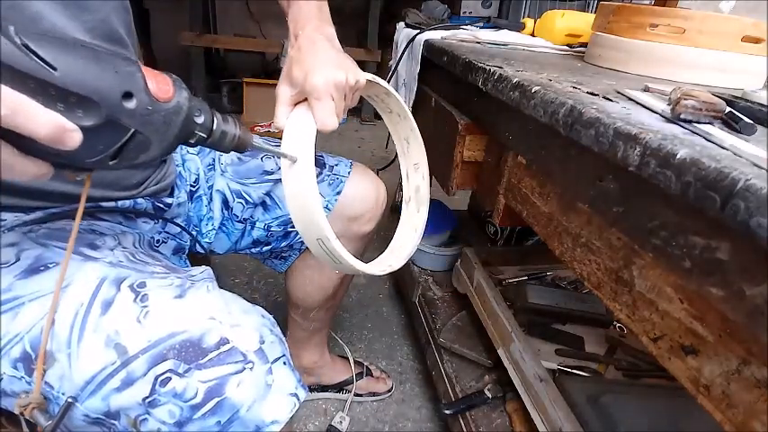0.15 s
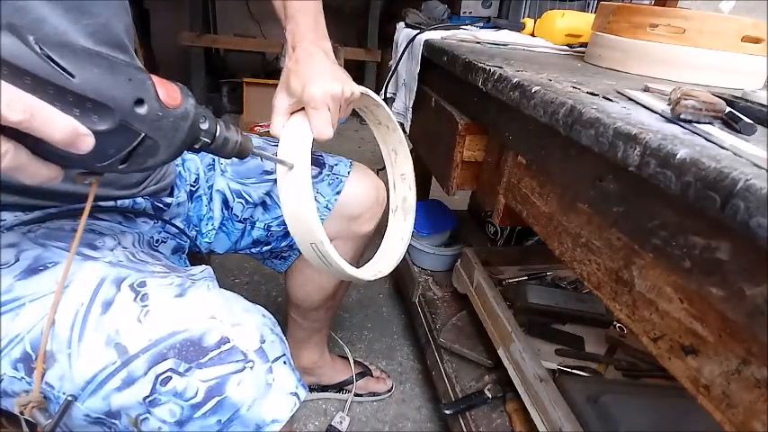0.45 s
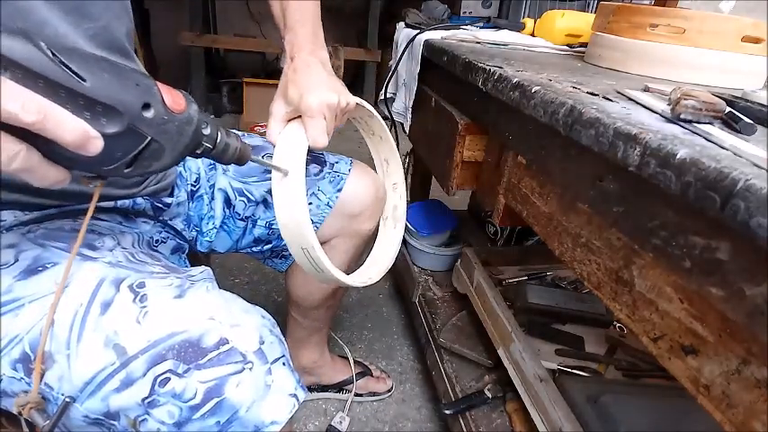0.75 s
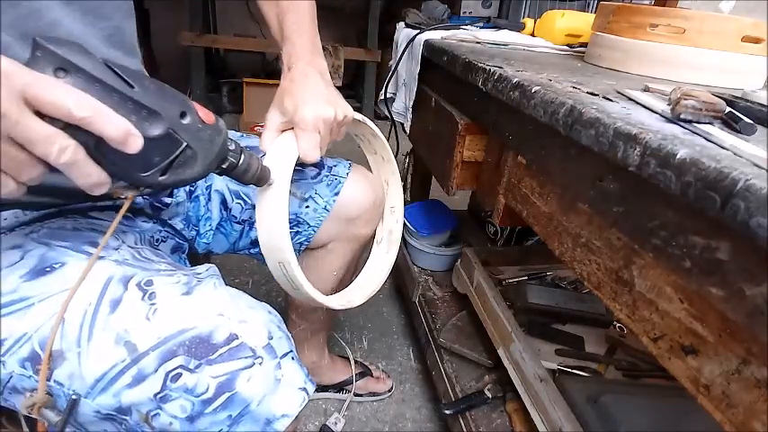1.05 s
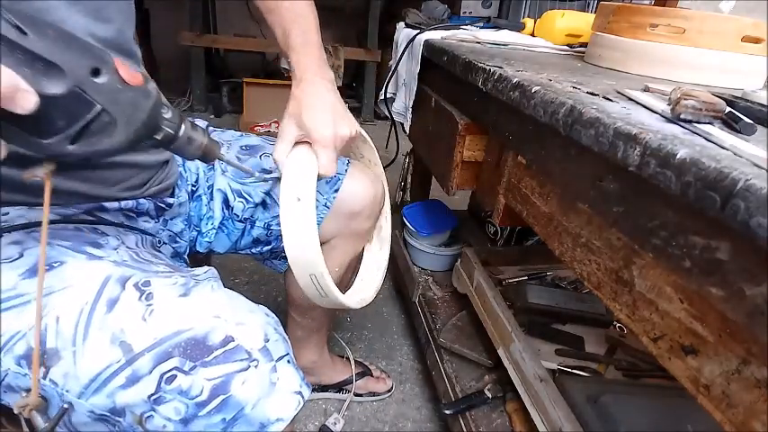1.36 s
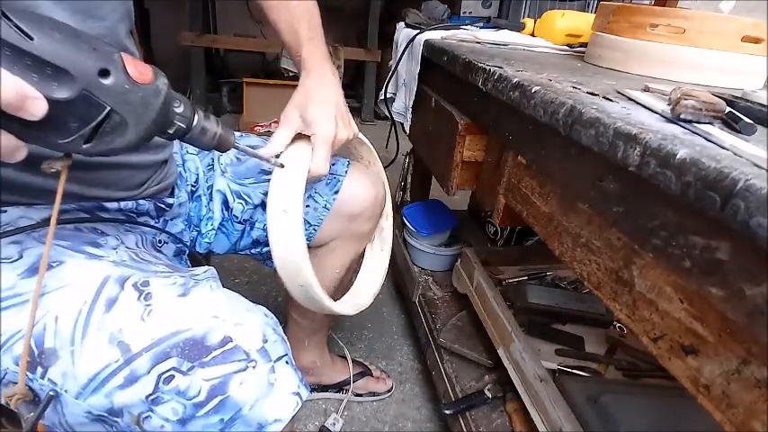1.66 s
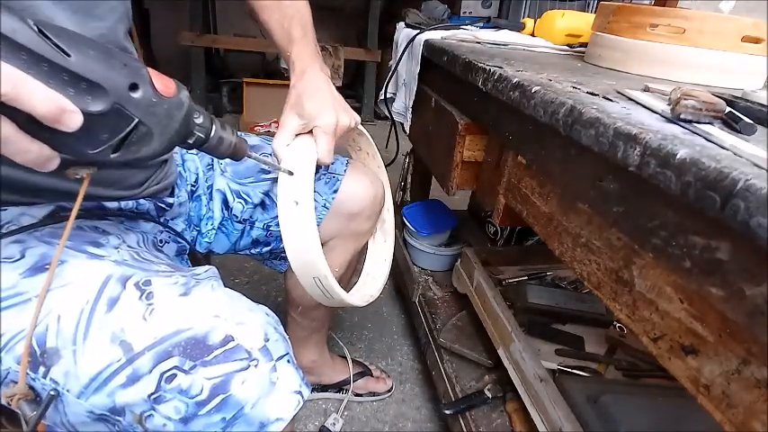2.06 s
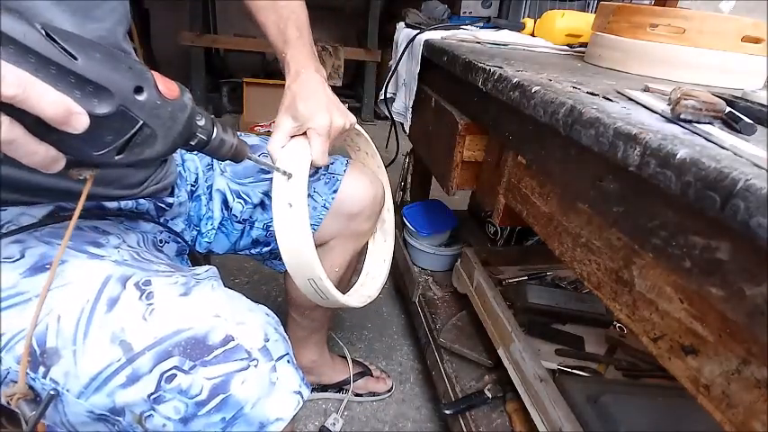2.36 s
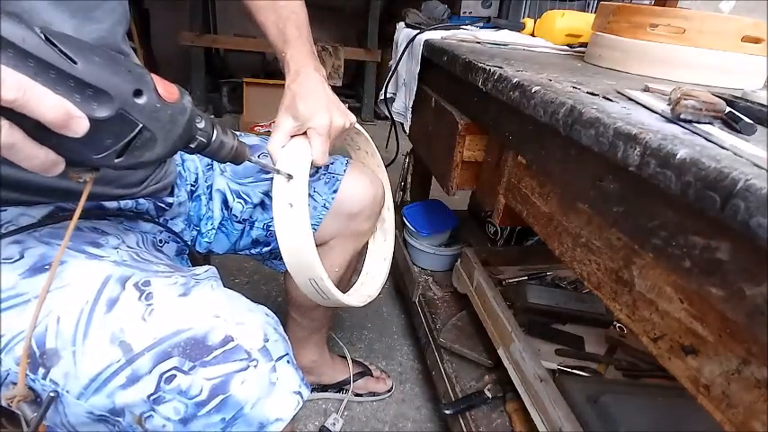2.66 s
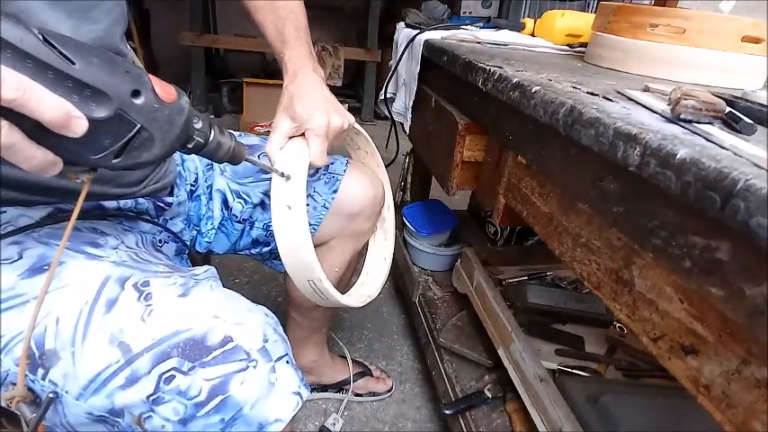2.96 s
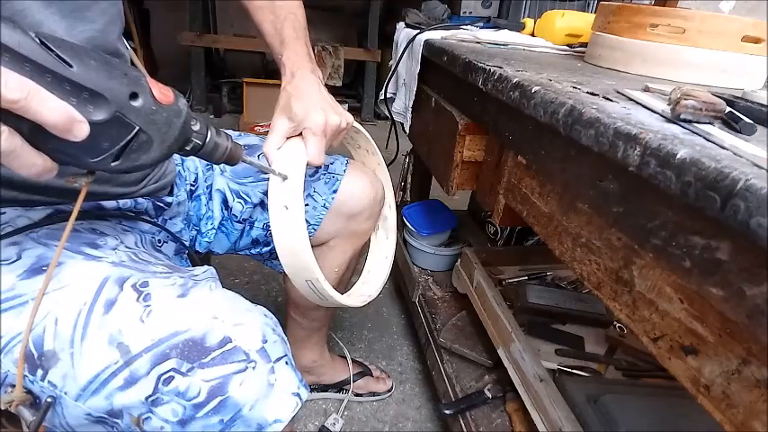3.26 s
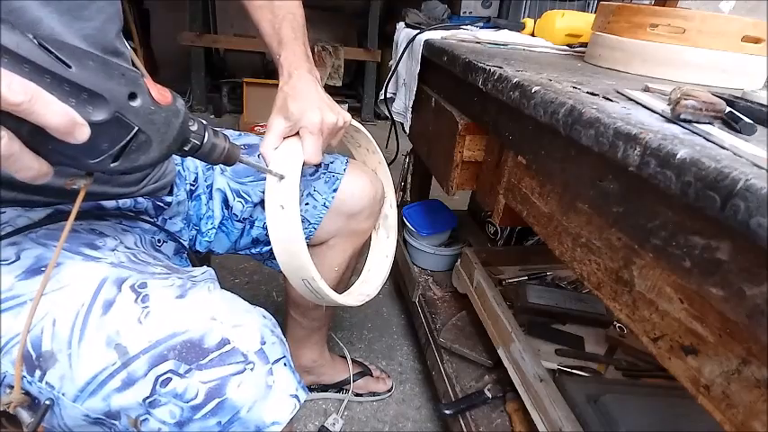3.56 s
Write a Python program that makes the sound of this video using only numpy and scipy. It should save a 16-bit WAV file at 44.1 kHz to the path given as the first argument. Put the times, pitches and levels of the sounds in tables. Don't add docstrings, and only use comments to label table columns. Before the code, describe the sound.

Close corded electric drill bores thin wood with a harsh, sagging whine, breaks through, coasts down into hissing rattle and separate gear knocks, then whines back up; open yard, close slightly hollow mono microphone.

```python
import sys
import numpy as np
from scipy import signal
from scipy.fft import rfft, irfft
from scipy.io import wavfile

SR = 44100
rng = np.random.default_rng(int(sys.argv[2]) if len(sys.argv) > 2 else 0)


def inscribe(sig):
    pcm = np.round(np.clip(np.atleast_2d(sig).T, -1, 1) * 32767)
    wavfile.write(sys.argv[1], SR, pcm.astype(np.int16))


def volts(x):
    e = np.asarray(x, float) / 20
    return 10 ** e


N = 163170

FREE_FROM_S = 1.24


def rms_one(x):
    return x / np.sqrt(np.mean(x ** 2) + 1e-20)


def in_time(rows):
    s, *columns = np.transpose(rows)
    return [np.interp(np.arange(N) / SR, s, c) for c in columns]


def between(start_s, end_s):
    t, fade_s = np.arange(N) / SR, 0.056
    return (np.tanh((t - start_s) / fade_s) - np.tanh((t - end_s) / fade_s)) / 2


def drift(rate_hz):
    r = np.exp(-40 * np.pi * rate_hz / SR)
    slow = signal.lfilter([1], [1, -2 * r, r * r], rng.standard_normal(N // 20 + 3002))[3000:]
    return np.interp(np.arange(N) / 20, np.arange(len(slow)), rms_one(slow))


def coloured(x, spectrum, patchy_db, peaks=()):
    hz = np.maximum(np.arange(N // 2 + 1) * SR / N, 1)
    points = np.array(spectrum)
    gain = volts(np.interp(np.log(hz), np.log(points[:, 0]), points[:, 1]))
    for top_hz, width_hz, db in peaks:
        gain = gain * (1 + volts(db) / 4 / (1 + (2 * (hz - top_hz) / width_hz) ** 2))
    wide = rfft(x) * gain
    place = 2 * np.log2(np.clip(hz, 60, 15360) / 60)
    total = 0
    for k in range(17):
        band = irfft(wide * np.clip(1 - abs(place - k), 0, 1), N)
        total = total + band * volts(patchy_db * drift(18.0))
    return rms_one(total)


def tones(mesh_hz, divide, orders):
    waver_db, waver_hz, speed_jitter = 2.5, 9.0, .0012
    turn = 2 * np.pi * np.cumsum(mesh_hz * (1 + speed_jitter * drift(25.0))) / SR / divide
    total = 0
    for k, db in orders:
        level = np.sqrt(2) * volts(db + waver_db * drift(waver_hz))
        total = total + level * np.sin(round(k) * turn + rng.uniform(0, 2 * np.pi))
    return total


def yard():
    spectrum = [(25, -38), (150, 3), (400, 5), (2000, -36)]  # hz, db
    return volts(-69.5) * coloured(rng.standard_normal(N), spectrum, patchy_db=7.0)


def fan(level_db, turns):
    # freq_hz, level_db
    air = [(150, -48), (600, -3.5), (1600, -7.5), (3500, 1.5), (6000, -2.5), (7600, -13.5), (10000, -22.5),
           (15500, -22)]
    # freq_hz, width_hz, level_db
    vents = [(3800, 100, 7), (5030, 83, 0.5), (6210, 430, 10.5)]
    chop = 1 + 0.45 * np.sin(2 * np.pi * turns)
    hiss = coloured(rng.standard_normal(N) * chop, air, patchy_db=0.7, peaks=vents)
    return volts(level_db + 0.72 * drift(22.0)) * hiss


def rattle(level_db):
    # freq_hz, level_db
    housing = [(40, -41.5), (200, -18.5), (450, -5.5), (1100, -1.5), (1600, -7), (4000, -5.5), (6200, -9),
               (9000, -31)]
    # freq_hz, width_hz, level_db
    shell = [(732, 85, -4), (980, 600, 3.5)]
    grind = coloured(rng.standard_normal(N), housing, patchy_db=1.65, peaks=shell)
    return volts(level_db + 0.44 * drift(45.0)) * grind


def bursts(clicks):
    t60_s = .010
    r = volts(-60 / (t60_s * SR))
    return signal.lfilter([np.e * (1 - r)], [1, -2 * r, r * r], clicks + 1e-18)


def knocks(level_db, turns):
    # time_s, peak_db
    hardest = np.array([(2.637, -13), (2.653, -11), (2.716, -9), (2.722, -9), (2.773, -13), (2.801, -12),
                        (2.816, -11), (2.834, -13), (2.849, -12), (2.871, -11), (2.881, -12), (2.901, -14),
                        (2.911, -11), (2.922, -9), (2.932, -12), (2.942, -13), (2.961, -15), (2.971, -9),
                        (2.981, -11), (2.992, -8), (3.007, -13), (3.023, -13), (3.035, -14), (3.042, -12),
                        (3.047, -8), (3.075, -8), (3.092, -9), (3.122, -7), (3.137, -8), (3.153, -7)])
    # freq_hz, level_db
    gearcase = [(150, -22.5), (500, -12.5), (1000, -2), (1500, -11), (2200, 1), (3300, -5), (6000, -12),
                (9000, -27)]
    # freq_hz, width_hz, level_db
    case_rings = [(960, 620, 13.4), (1890, 430, 12.8), (3590, 120, 27), (5050, 73, 6.8), (6030, 460, 23)]
    spread_db, trim_db = 4.0, -6
    at = np.flatnonzero(np.diff(np.floor(turns + .12 * drift(60.0))) > 0)
    clicks, hard = np.zeros(N), np.zeros(N)
    clicks[at] = volts(spread_db * rng.standard_normal(N)[at])
    hard[(hardest[:, 0] * SR).astype(int)] = volts(hardest[:, 1] + trim_db)
    loose = bursts(clicks) * volts(level_db - 3 * between(2.76, 3.16))
    drive = rng.choice([-1, 1], N) * (loose + bursts(hard))
    return coloured(drive, gearcase, patchy_db=-0.5, peaks=case_rings) * np.sqrt(np.mean(drive ** 2))


def rotor_hum(mesh_hz, turns, powered):
    level_db, db_per_octave, loaded_db = -32.5, 19, -3.5
    slope_db = db_per_octave * np.log2(mesh_hz / mesh_hz[0]) * (1 + (mesh_hz < 1300))
    return volts(level_db + slope_db + loaded_db * powered + 0.7 * drift(3.6)) * np.sin(2 * np.pi * turns)


def mains_and_chuck(turns, powered):
    mains_hz, mains_db, chuck_share, chuck_db = 240, -46, .425, -55
    mains = volts(mains_db) * np.sin(2 * np.pi * mains_hz * np.arange(N) / SR)
    chuck = volts(chuck_db + 3 * drift(1.8)) * np.sin(2 * np.pi * chuck_share * turns)
    return powered * (mains + chuck)


def brushes(mesh_hz):
    # multiple (of mesh speed / 5.6), level_db
    whistles = [(33, -54), (37, -51)]
    return between(1.3, 1.93) * tones(mesh_hz * (1 + 0.0042 * drift(28.0)), 5.6, whistles)


def idler_shaft(mesh_hz):
    # multiple (of a seventh of mesh speed), level_db, loud_from_s, loud_to_s
    idler = [(1, -39, -.2, 0.52), (2, -29.5, 0.23, 0.75), (3, -40, .1, .7), (4, -24.5, 0.42, 0.923),
             (6, -29.5, 0.0041, 0.83), (12, -30, -.2, 0.7), (19, -32, .15, 0.79)]
    rest_db, freed_db = -10, -40 * (np.arange(N) / SR > FREE_FROM_S)
    orders = [(k, db + rest_db * (1 - between(a, b)) + freed_db) for k, db, a, b in idler]
    return tones(mesh_hz, 7, orders)


def rotor_sides(mesh_hz, mesh_db):
    # rotor_multiple, level_db (re the nearest mesh line)
    rotor = [(5, -16), (7, -12), (13, -7), (14, -14), (15, -13), (16, -12), (17, -8), (19, -18)]
    return tones(mesh_hz, 6, [(k, db + mesh_db[round(k / 6) - 1]) for k, db in rotor])


def motor_speed():
    # time_s, mesh_hz, tone_db, second_db, third_db
    boring = [
        (0, 2131, -18.5, -18.5, -30.5),
        (.33, 2144, -15.5, -22.5, -20.5),
        (.62, 2117, -14, -25, -26),
        (.9, 2029, -14, -20, -27),
        (1.0, 1965, -14, -18, -31),
        (1.195, 1923, -10, -14.5, -21.5),
        (1.23, 1950, -13.5, -22, -37),
        (1.28, 2066, -23, -31, -32),
        (1.35, 2137, -24, -21, -31),
    ]
    # time_s, mesh_hz, tone_db, second_db, third_db
    coast = [
        (1.43, 2318, -44, -50, -50),
        (2.2, 1407, -82, -80, -80),
        (2.93, 600.8, -80, -67, -78),
        (3.1, 390, -80, -77, -80),
    ]
    # time_s, mesh_hz, tone_db, second_db, third_db
    restart = [
        (3.16, 950, -38, -55, -50),
        (3.29, 1680, -26, -42, -27),
        (3.39, 1920, -21, -37, -26),
        (3.48, 2065, -20, -31, -27),
        (3.61, 2185, -22, -33, -38),
        (3.7, 2215, -25, -29, -36),
    ]
    mesh_hz, *mesh_db = in_time(list(boring) + list(coast) + list(restart))
    return mesh_hz, mesh_db


def gear_mesh(turns, mesh_db):
    rough_db = np.where(np.arange(N) / SR > FREE_FROM_S, 3.5, 1.5)
    total = 0
    for k, db in enumerate(mesh_db):
        phase = 12 * np.pi * (k + 1) * turns + rough_db / 8 * drift(60.0)
        total = total + np.sqrt(2) * volts(db + rough_db * drift(45.0)) * np.sin(phase)
    return total


def scene():
    # time_s, fan_db, grind_db, knock_db
    effort = [(0, -15.5, -21, -26.5), (.35, -15.5, -20.5, -25), (.68, -13, -19.5, -32),
              (.99, -15, -24.5, -27), (1.18, -19, -21, -32), (1.27, -16.5, -16, -24.5),
              (1.54, -24.5, -14, -27), (1.8, -21, -15, -53), (2.1, -21.5, -17.5, -37),
              (2.4, -27.5, -20, -26), (2.62, -27, -22.5, -24.5), (2.8, -30.5, -29, -31),
              (3.07, -30, -29, -29), (3.17, -21.5, -19, -16), (3.3, -17, -21.5, -21), (3.5, -15, -17, -23),
              (3.7, -15, -19.5, -20.5)]
    air_db, rattle_db, knock_db = in_time(effort)
    mesh_hz, mesh_db = motor_speed()
    turns = np.cumsum(mesh_hz) / SR / 6
    powered = np.clip((mesh_db[0] + 47) / 10, 0, 1)
    mix = yard() + fan(air_db, turns) + rattle(rattle_db) + knocks(knock_db, turns)
    mix = mix + rotor_hum(mesh_hz, turns, powered) + mains_and_chuck(turns, powered) + brushes(mesh_hz)
    mix = mix + idler_shaft(mesh_hz) + rotor_sides(mesh_hz, mesh_db) + gear_mesh(turns, mesh_db)
    return np.tile(mix, (2, 1))


def starve(x):
    # time_s, threshold_db (re the strongest partial)
    starved = [(1.863, -8), (1.971, -9), (2.078, -6), (2.183, -7), (2.697, -7), (3.249, -9)]
    size, left_db, from_hz, to_hz = int(.03 * SR), -17, 1450, 14600
    out = x.copy()
    window = np.sin(np.pi * np.arange(size) / size)
    hz = np.arange(size // 2 + 1) * SR / size
    for s, under_db in starved:
        i = int(s * SR) - size // 2
        lines = rfft(x[i:i + size] * window) * (hz > from_hz) * (hz < to_hz)
        weak = abs(lines) < volts(under_db) * abs(lines).max()
        out[i:i + size] -= window * irfft(lines * weak * (1 - volts(left_db)), size)
    return out


def top_cut(x):
    return signal.sosfilt(signal.butter(12, 17140, fs=SR, output="sos"), x)


def record(dry):
    # freq_hz, half_turns (phase between the ports; odd = null)
    ports = [(0, 0), (2860, 1), (8500, 3), (14110, 5), (19800, 7)]
    null_floor_db, hole_hz, hole_width_hz = -42, 8535, 500
    lift_db, lift_hz, cutoff_hz = 10, 14400, 15780
    hz = np.arange(N // 2 + 1) * SR / N
    comb = np.cos(np.pi / 2 * np.interp(hz, *np.transpose(ports))) + 1j * volts(null_floor_db)
    away = ((hz - hole_hz) / hole_width_hz) ** 2
    hole = away / (1 + away)
    top = volts(lift_db / (1 + np.exp((lift_hz - hz) / 400)) - np.clip((hz - cutoff_hz) / 2, 0, 90))
    mono = starve(irfft(rfft(dry[0]) * comb * top * hole, N))
    return top_cut(np.tile(mono, (2, 1)))


dry = scene()
out = record(dry)
inscribe(out)
```